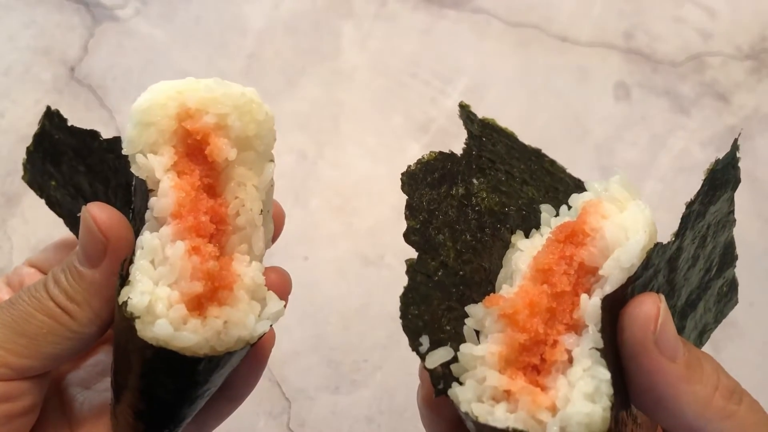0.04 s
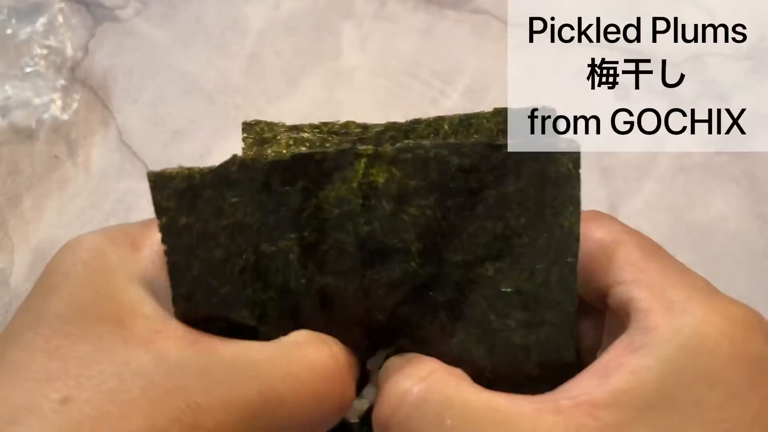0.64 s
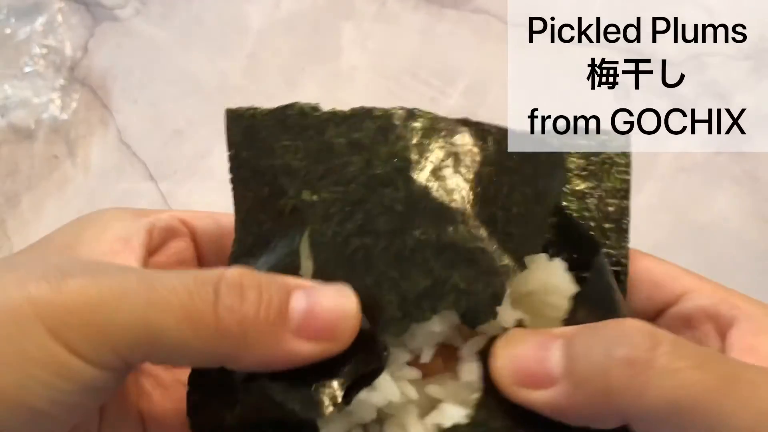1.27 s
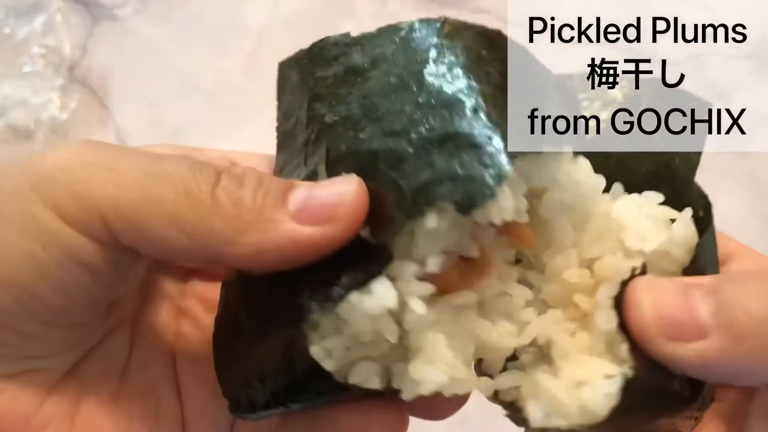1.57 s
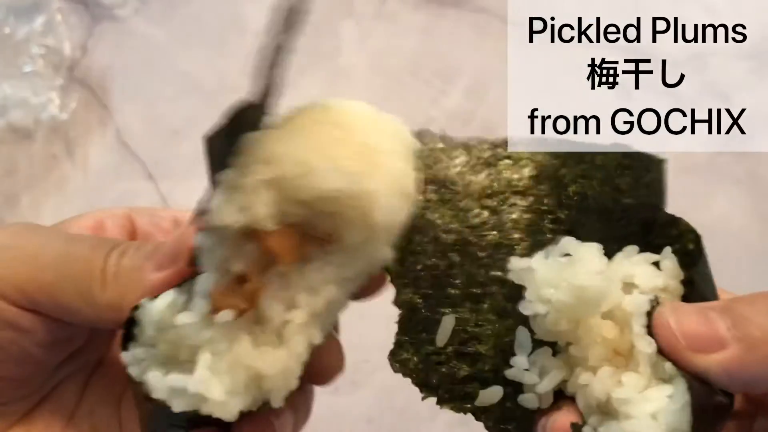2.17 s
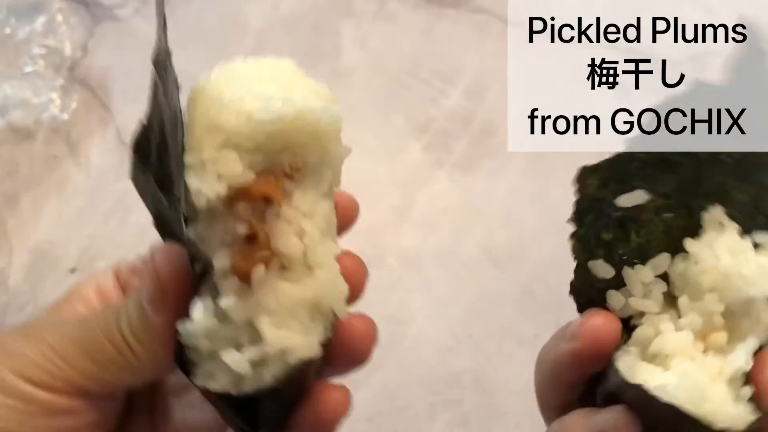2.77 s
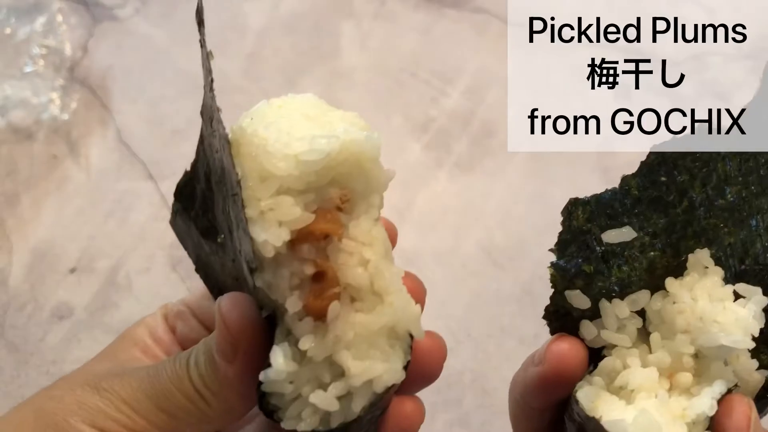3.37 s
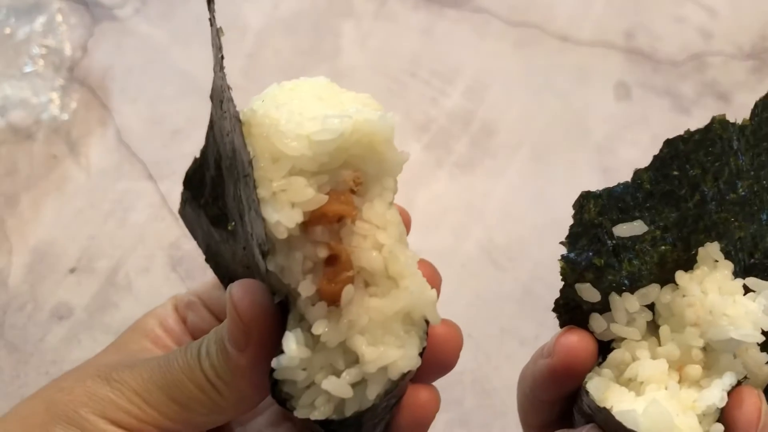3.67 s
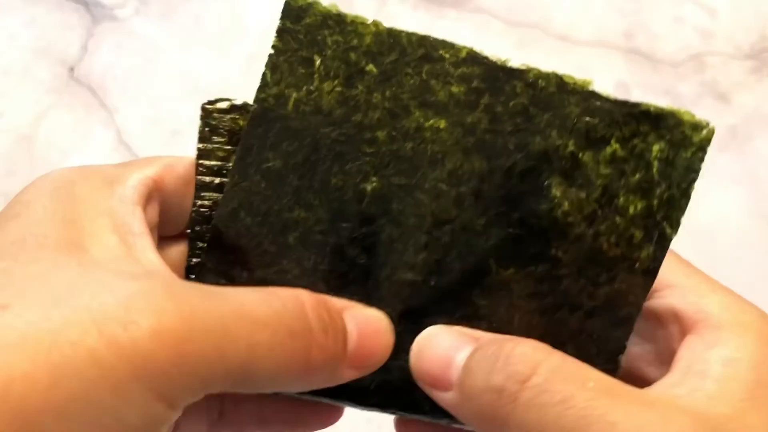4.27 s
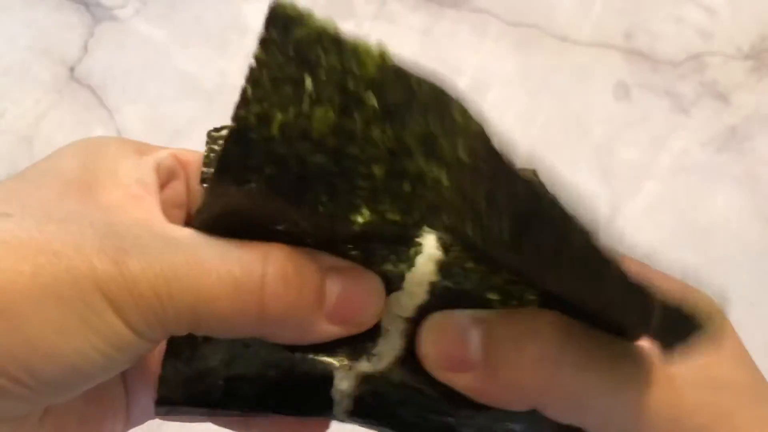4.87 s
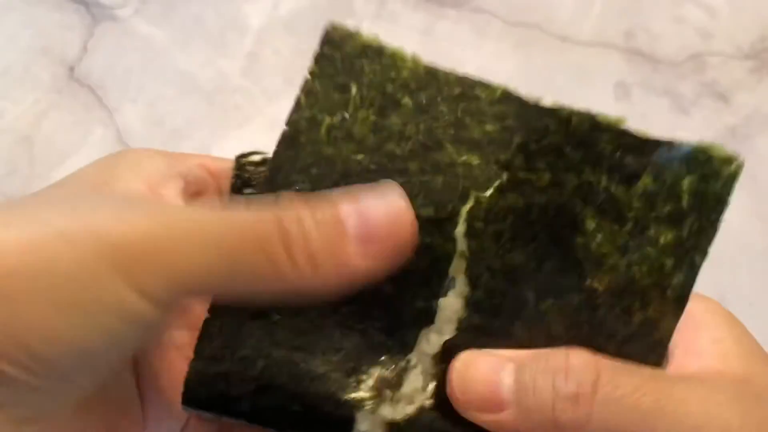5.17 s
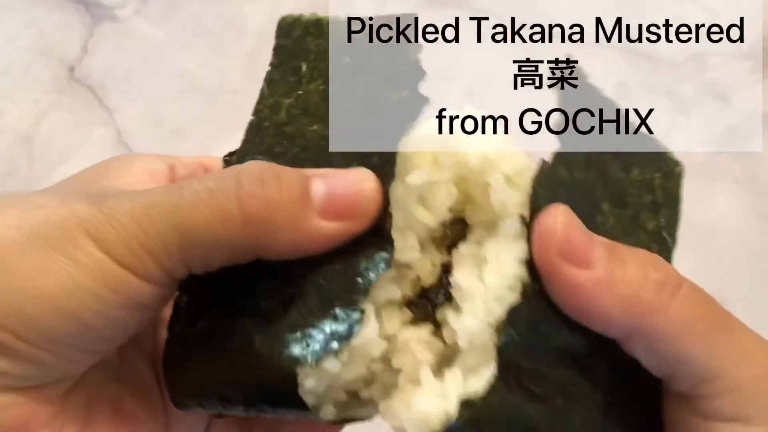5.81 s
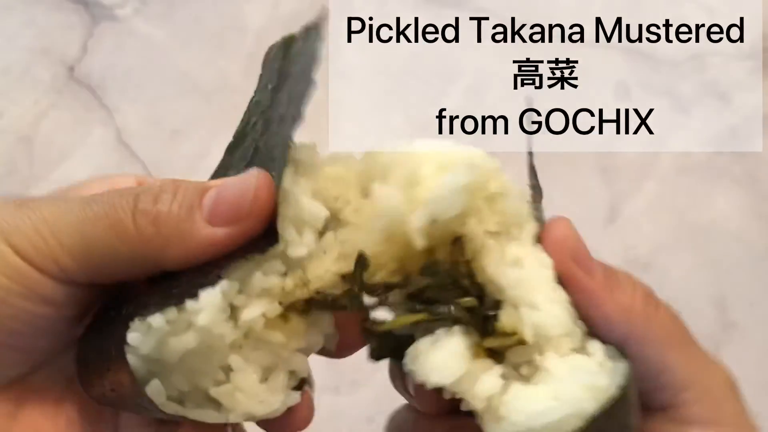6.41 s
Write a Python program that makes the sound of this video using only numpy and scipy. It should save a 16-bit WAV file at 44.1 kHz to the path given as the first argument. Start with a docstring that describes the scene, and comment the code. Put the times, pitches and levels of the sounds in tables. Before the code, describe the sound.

Two bouts of brittle seaweed snapping and rustling between fingers, with a short pause between them, in a small, softly humming room.

```python
"""Crisp dried seaweed cracks and tears as two rice balls wrapped in it are pulled apart by hand.
The brittle sheet snaps in single cracks and in quick runs, and each crack rings the flap it frees.
Between cracks the sheet rubs on fingers and rice, hissing and shedding tiny flakes.
It is all close by, over a table, in a small room that echoes softly and hums with an appliance."""
import sys
import numpy as np
from scipy import signal
from scipy.fft import rfft, irfft, next_fast_len
from scipy.io import wavfile
from scipy.ndimage import uniform_filter1d, map_coordinates

SR = 44100
rng = np.random.default_rng(int(sys.argv[2]) if len(sys.argv) > 2 else 0)


def unload_audio(sound):
    """Save the sound as a 16-bit wav file, at the path given as the first command line argument."""
    columns = np.transpose(np.atleast_2d(sound))
    # keep every value between -1 and 1, then stretch to whole-number steps
    steps = np.round(np.clip(columns, -1, 1) * 32767)
    wavfile.write(sys.argv[1], SR, steps.astype(np.int16))


N = 284445

# the tone of the room's ventilation noise: (f/Hz, level/dB)
AIR_TONE = [(12, -69.5), (20, -32.5), (35, -32.5), (60, -11), (91, -9.5), (150, -10), (172, -13),
            (216, -12.5), (262, -15), (337, -15), (624, -23.5), (802, -23), (1060, -25), (1400, -31),
            (16000, -61)]
# the notes in the appliance's hum: (f/Hz, level/dB)
HUM_NOTES = [(53.8, -55), (145.3, -59.5), (231.5, -67), (990.5, -73)]
# single cracks: (t/s, level/dB, bass/dB, treble/dB, ring of the freed flap f/Hz)
SINGLE_CRACKS = [(0.326, -56, 0, -22, 2100), (0.532, -19, -14.5, 0.5, 5000), (0.542, -18, -14.5, 5, 2110),
                 (0.584, -22.5, -14, -5, 1840), (0.621, -28.5, -30, 0.5, 4370),
                 (0.685, -32.5, -5.5, -4, 1530), (0.752, -33.5, -25, -3, 3740),
                 (0.803, -25, -11, -1.5, 2730), (0.812, -23.5, -11, 1, 1990), (0.8664, -18, -14, -4, 4460),
                 (0.8984, -21, -11.5, 0.5, 2630), (0.9553, -19, -21, 1, 2900),
                 (0.9911, -18.5, -16, 3.5, 2660), (0.9226, -25, -4, 5, 5700),
                 (0.9965, -20, -7.5, 1.5, 1990), (1.009, -22.5, -15, -3, 2550),
                 (1.033, -23.5, -7, -2, 2600), (1.1063, -30.5, -15, -0.5, 4960),
                 (1.1344, -22.5, -14, -1.5, 2200), (1.2205, -36, -20, -12, 2600),
                 (1.2361, -31, -1.5, -9.5, 1940), (1.2745, -21, -10.5, 2.5, 6570),
                 (1.313, -33.5, -6, -24, 2060), (1.381, -35.5, -25, -0.5, 4600),
                 (1.4073, -40, -17, 4, 5200), (1.429, -29, -16, 1, 5140), (1.4666, -30, -20, -1, 6370),
                 (1.477, -20.5, -12.5, -0.5, 5960), (1.523, -35.5, -14, 1, 4450),
                 (1.5748, -21.5, -9.5, -0.5, 3780), (1.586, -24.5, -10.5, -3, 4100),
                 (1.6333, -30, -20, 6.5, 7650), (1.6416, -34.5, -14, 3, 3280), (1.697, -41, -16, 4, 6900),
                 (1.761, -21.5, -20.5, 0, 2920), (1.8256, -47, -11, 6, 7000), (1.8726, -43, -4, 7, 6400),
                 (1.9386, -35.5, -7, 4, 3400), (1.9823, -34, -15, 1, 2550), (2.021, -17, -29, -14, 2920),
                 (2.042, -21, -23, 3, 4900), (2.069, -17, -20, -9, 2760), (2.0366, -21.5, -20, -1, 5000),
                 (2.0837, -28, -2.5, -14, 2040), (2.097, -23.5, -14, 1, 2750), (2.141, -23.5, -12, 2, 4220),
                 (2.116, -20.5, -7.5, -0.5, 5030), (2.153, -20.5, -15.5, 1, 3250),
                 (2.247, -31, -11, -6, 2560), (2.504, -37.5, -14, -6.5, 2200), (2.593, -50, -20, 2, 2400),
                 (2.7747, -32, -9.5, -19, 2420), (2.7784, -32, -18, -4, 3200),
                 (2.8467, -36, -12.5, -16, 2700), (3.459, -51.5, -22, -11, 3600),
                 (3.475, -53.5, -22.5, -10.5, 3600), (3.6506, -50, -19, -10.5, 3500),
                 (3.9005, -57, -19.5, -9, 3390), (4.5005, -22.5, -13, 0.5, 5860),
                 (4.520, -23, -14, 0.5, 3300), (4.5286, -33, -13, 3, 4000),
                 (4.5753, -20.5, -21.5, -10, 4600), (4.5843, -20, -11, 0, 1890),
                 (4.5968, -16, -14.5, 0, 2640), (4.6534, -26.5, -10, 0.5, 3200),
                 (4.7398, -20, -11, -15.5, 2130), (4.7844, -37, -14, -1, 5500),
                 (4.8066, -31.5, -8, 2.5, 4500), (4.849, -14, -40, 0, 2210), (4.8783, -15, -13, 2, 6800),
                 (4.8997, -24.5, -5, 6.5, 8200), (5.0704, -29, -13, -4.5, 5200),
                 (5.0882, -27, -9.5, -9, 2060), (4.961, -36.5, -17, -14, 1880),
                 (5.0945, -31.5, -11, -18, 1970), (5.2377, -37.5, -9, 6, 6000),
                 (5.2898, -29.5, -12.5, -0.5, 6000), (5.3075, -33, 1, -33, 2020),
                 (5.4075, -35, -2.5, -15, 1800), (5.4168, -37.5, -27, -8, 2400),
                 (5.4541, -13.5, -8.5, -6.5, 2800), (5.486, -29, -10, -4, 1780),
                 (5.533, -14.5, -9, -5, 2310), (5.613, -42.5, -17, 6, 5500), (5.6877, -38, -0.5, -11, 2040),
                 (5.8423, -26.5, -18, -10, 2570), (5.9173, -28, -9, -18, 3270),
                 (6.0652, -27.5, -18, -0.5, 4030), (6.093, -29.5, -21, -2, 4740),
                 (6.131, -25.5, -17.5, 0.5, 4230), (6.1616, -31.5, -18, 3, 5160),
                 (6.1887, -30.5, -15.5, -12, 1970), (6.3885, -41, -20, 5.5, 5660),
                 (6.2012, -33.5, -24, 3, 4500), (6.226, -38.5, -11, 0, 5800)]
# the tone of the sheet when it cracks: (f/Hz, level/dB)
CRACK_TONE = [(70, -22), (170, -9), (350, -4.5), (650, -10.5), (1050, -5), (1350, -6), (1900, -0.5),
              (3300, -4), (5500, -2.5), (9000, -2.5), (12500, -3.5), (16000, -6)]
# how long the room's echo takes to fade by 60 dB: (f/Hz, fade time/s)
ECHO_FADE = [(200, 1), (2500, 0.42), (7000, 0.41), (15000, 0.15)]
# the tone of the sheet when it rubs: (f/Hz, level/dB)
RUB_TONE = [(80, -30), (280, 0.5), (700, -9.5), (1300, -3.5), (1700, -2), (2400, 0.5), (3200, -3.5),
            (5800, -6), (9000, -10.5), (13000, -12), (16000, -14.5)]
# how hard the sheet rubs and crumbles as the first ball is opened: (t/s, level/dB)
FIRST_BALL_RUB = [(0.45, -76), (0.55, -46.5), (0.8, -47.5), (0.96, -43.5), (1.08, -50.5), (1.45, -56.5),
                  (1.6, -46.5), (1.74, -55), (1.8, -50), (1.98, -57), (2.12, -36), (2.21, -54.5),
                  (2.42, -59.5), (2.55, -55.5), (2.82, -57.5), (3.1, -74.5)]
# the same for the second ball: (t/s, level/dB)
SECOND_BALL_RUB = [(4.275, -78), (4.295, -55.5), (4.48, -51.5), (4.58, -40), (4.67, -50.5), (4.93, -52.5),
                   (5.06, -45), (5.41, -57), (5.5, -47.5), (5.7, -57.5), (5.8, -54), (5.98, -50.5),
                   (6.04, -60), (6.15, -49.5), (6.33, -64), (6.44, -52)]
# tears, where a split runs on through the sheet: (t/s, length/s, crack level/dB, bass/dB, treble/dB)
RUNNING_TEARS = [(0.559, 0.05, -34, -17, -3), (0.816, 0.03, -33, -11, -1),
                 (0.915, 0.015, -20.5, -14.5, 2.5), (0.934, 0.05, -35, -6, 4.5),
                 (0.994, 0.014, -27, -13, -1), (1.17, 0.04, -41.5, -16, 0), (1.56, 0.025, -31.5, -19, 0.5),
                 (2.051, 0.106, -28, -6.5, -3.5), (4.551, 0.073, -26.5, -11, 0.5),
                 (4.777, 0.045, -44.5, -12, 6), (4.882, 0.014, -24, -6.5, -4), (5.978, 0.026, -33, -19, 6),
                 (6.071, 0.035, -33.5, -19, 3), (6.136, 0.045, -39, -8.5, 8.5)]

FLAP_HZ, FLAP_OCTAVES = 3300, 0.44  # the usual ring of a freed flap, and how much it varies


def amp(db):
    """Turn decibels into a number to multiply by."""
    return 10 ** (np.asarray(db) / 20)


def unit(x):
    """Scale a signal to an average (rms) size of 1."""
    return x / np.sqrt(np.mean(x ** 2) + 1e-20)


def along(points, hz):
    """Read a table of (f/Hz, value) between its rows, on a scale of octaves."""
    freqs, values = np.transpose(points)
    return np.interp(np.log(hz + 1), np.log(freqs), values)


def wobble(rate):
    """A smooth curve through random values, `rate` of them a second."""
    return map_coordinates(rng.standard_normal(int(N * rate / SR) + 4), [np.arange(N) * rate / SR])


def filtered(x, response):
    """Turn each frequency in x up or down by response(hz)."""
    size = next_fast_len(N + SR // 2)
    return irfft(rfft(x, size) * response(np.fft.rfftfreq(size, 1 / SR)), size)[:N]


def causal(gain):
    """A filter with this gain that rings only after it is struck, never before."""
    cepstrum = irfft(np.log(np.maximum(gain, 1e-6)))
    half = cepstrum.shape[-1] // 2
    cepstrum[..., 1:half] *= 2
    cepstrum[..., half + 1:] = 0
    return np.exp(rfft(cepstrum))


def air_and_hum(air_db=-56, waver_db=3, drift_rad=.9):
    """Ventilation makes a soft rush, and an appliance hums unsteadily."""
    t = np.arange(N) / SR
    air = unit(filtered(rng.standard_normal(N), lambda hz: amp(along(AIR_TONE, hz))))
    hum = sum(amp(db + waver_db * wobble(18)) * np.sin(2 * np.pi * hz * t + drift_rad * wobble(14))
              for hz, db in HUM_NOTES)
    return amp(air_db) * air + hum


def crack_life(db, bass_db, treble_db, usual_s=.014, usual_db=-24.5, usual_bass_db=-13):
    """Seconds to fade by 60 dB: strong, wide or splintering cracks outlast small, clean ones."""
    strong = (db - usual_db) / 40  # 40 dB stronger lasts twice as long
    wide = (bass_db - usual_bass_db) / 30
    splintering = treble_db / 28
    return usual_s * 2 ** (strong + wide + splintering)


def cracking(rows, size=4096, uneven_db=6, first_db=8, flap_db=4.5, flap_sharpness=2.4, bass_life=2.22):
    """Each crack is one sharp break and a dying run of tiny fractures that rings the flap it frees."""
    start_s, db, bass_db, treble_db, flap_hz = np.transpose(rows)[:, :, None]
    life_s = crack_life(db, bass_db, treble_db)
    t, hz = np.arange(size) / SR, np.fft.rfftfreq(size, 1 / SR)
    strength, *noises = rng.standard_normal((len(start_s), 4, size)).transpose(1, 0, 2)
    # the first break is the strongest; the fractures after it come in very uneven sizes
    break_db = first_db * np.exp(-t / .0004)
    attack = 1 - np.exp(-t / .00012)
    fractures = amp(uneven_db * np.clip(strength, -2, 2) + break_db) * attack
    flap = 1 + amp(flap_db) / (1 + (flap_sharpness * (hz / flap_hz - flap_hz / (hz + 1))) ** 2)
    # wide cracks move the whole sheet and have a bass that lingers; hairline cracks are all treble
    treble_hz = 6000 * 2 ** (np.minimum(treble_db, 0) / 38)  # dull cracks lose their top from lower down
    low = 1 / (1 + (hz / 1200) ** 12)
    high = 1 - 1 / (1 + (hz / treble_hz) ** 12)
    bands = (low, bass_db, bass_life), (abs(1 - low - high), 0, 1), (high, treble_db, 1)
    cracks = 0
    for noise, (share, band_db, stretch) in zip(noises, bands):
        burst = noise * fractures * amp(-60 * t / (life_s * stretch))
        ring = rfft(burst) * causal(np.sqrt(share) * amp(along(CRACK_TONE, hz)) * flap)
        # a crack's level counts its energy as if spread over 2 ms
        power = 2 * np.sum(abs(ring) ** 2, axis=1, keepdims=True) / size / (.002 * SR)
        cracks = cracks + amp(db + band_db) * ring / np.sqrt(power)
    # slow bending waves bring the lowest notes a little late
    lag_s = .0033 / (1 + (hz / 550) ** 4)
    waves = irfft(cracks * np.exp(-2j * np.pi * np.cumsum(lag_s) * SR / size))
    index = np.round(start_s * SR).astype(int) + np.arange(size)
    return amp(-0.17) * np.bincount(index.ravel(), waves.ravel(), N)[:N]  # add each crack in at its time


def room_echo(x, echo_db=-18.5):
    """The walls return a soft, diffuse wash of sound whose treble dies first."""
    echoes = np.zeros(N + SR)
    step, delay = SR // 8, SR // 250
    for start in range(0, N, step):  # a new random tail every eighth of a second, so no note stands out
        hz, t, noise = signal.stft(rng.standard_normal(SR // 2), SR, nperseg=256)
        fade = amp(-60 * t / along(ECHO_FADE, hz)[:, None])
        tail = signal.istft(noise * fade, SR, nperseg=256)[1]
        echo = signal.fftconvolve(x[start:start + step], tail / np.linalg.norm(tail))
        echoes[start + delay:][:len(echo)] += echo
    soft_walls = lambda hz: 1 / np.sqrt(1 + (hz / 11000) ** 2)
    return amp(echo_db) * filtered(echoes[:N], soft_walls)


def rub_level():
    """How hard the sheet rubs at each sample, in dB."""
    return np.interp(np.arange(N) / SR, *np.transpose(FIRST_BALL_RUB + SECOND_BALL_RUB))


def patchy_noise(depth_db, size=512):
    """White noise that swells and fades in small patches of pitch and time."""
    noise = signal.stft(rng.standard_normal(N), nperseg=size)[2]
    across_pitch = uniform_filter1d(rng.standard_normal(noise.shape), size=4, axis=0)
    patches = uniform_filter1d(across_pitch, size=10, axis=1)
    return signal.istft(noise * amp(depth_db * unit(patches)), nperseg=size)[1][:N]


def rubbing(level_db, hiss_db=-2, flutter_db=2.5):
    """Seaweed sliding on fingers and rice hisses unevenly."""
    friction = patchy_noise(depth_db=2.4)
    hiss = unit(filtered(friction, lambda hz: amp(along(RUB_TONE, hz))))
    flutter = wobble(30) + wobble(400)
    return amp(level_db + hiss_db + flutter_db * flutter) * hiss


def flaking(level_db, usual_per_s=55, tick_hz=7500, life_s=.0004, boost_db=10.5, spread_db=4.5, size=256):
    """Flakes break off as tiny bright ticks of every size, more often the harder the sheet is pulled."""
    rate = usual_per_s * amp(level_db - np.median(level_db))
    at = np.flatnonzero(rng.random(N) < rate / SR)
    pitch, weight = np.clip(rng.standard_normal((len(at), 2)), -2, 2).T[:, :, None]
    t, hz = np.arange(size) / SR, np.fft.rfftfreq(size, 1 / SR)
    octaves_away = np.log2((hz + 1) / tick_hz) - pitch / 2
    bursts = rng.standard_normal((len(at), size)) * np.exp(-t / life_s)
    ticks = irfft(rfft(bursts) * causal(1 / (1 + octaves_away ** 2 / 2)))
    # where many break at once they share the strain
    sharing = np.minimum(1, usual_per_s / rate[at, None]) ** (1 / 4)
    ticks *= sharing * amp(level_db[at, None] + boost_db + spread_db * weight)
    return np.bincount((at[:, None] + np.arange(size)).ravel(), ticks.ravel(), N)[:N]


def tearing(cracks_per_s=140, scatter_db=2.5):
    """A tear is a quick, uneven run of cracks, each freeing a flap of its own size."""
    rows = []
    for start_s, length_s, db, bass_db, treble_db in RUNNING_TEARS:
        count = max(1, round(length_s * cracks_per_s))
        slip, weight, flap = np.clip(rng.standard_normal((32, 3)), -2, 2)[np.arange(count) % 32].T
        times = start_s + (np.arange(count) + slip / 4) * length_s / count
        rows += [(t, db + scatter_db * w, bass_db, treble_db, FLAP_HZ * 2 ** (FLAP_OCTAVES * f))
                 for t, w, f in zip(times, weight, flap)]
    return rows


def crinkling(cracks_per_s=14, boost_db=6, scatter_db=2.5, bass_db=-14, treble_db=4, still_db=-56):
    """Small cracks come at random while the sheet is bent, a little louder than its rubbing."""
    slots = 128  # equal stretches of time, each with room for one crack
    chance, place = rng.random((2, slots))
    weight, flap = np.clip(rng.standard_normal((slots, 2)), -2, 2).T
    at = (np.arange(slots) + place) * N / slots
    rub_db = rub_level()[at.astype(int)]
    happens = (rub_db > still_db) & (chance < cracks_per_s * N / SR / slots)
    crack_db = rub_db + boost_db + scatter_db * weight
    flap_hz = FLAP_HZ * 2 ** (FLAP_OCTAVES * flap)
    return [(at[k] / SR, crack_db[k], bass_db, treble_db, flap_hz[k]) for k in np.flatnonzero(happens)]


def scene():
    """The seaweed close by, its echo and the room's own noise."""
    rub_db = rub_level()
    seaweed = rubbing(rub_db) + flaking(rub_db) + cracking(SINGLE_CRACKS + tearing() + crinkling())
    return (seaweed + room_echo(seaweed) + air_and_hum())[None]


def record(dry):
    """The sharpest peaks are rounded off, and the very highest treble is cut away."""
    ceiling, top_hz = .62, 16250
    treble_cut = lambda hz: 1 / np.sqrt(1 + (hz / top_hz) ** 120)
    heard = filtered(dry[0], treble_cut)
    rounded = heard / (1 + (heard / ceiling) ** 8) ** (1 / 8)
    return filtered(rounded, treble_cut)[None]


dry = scene()
out = record(dry)
unload_audio(out)
```